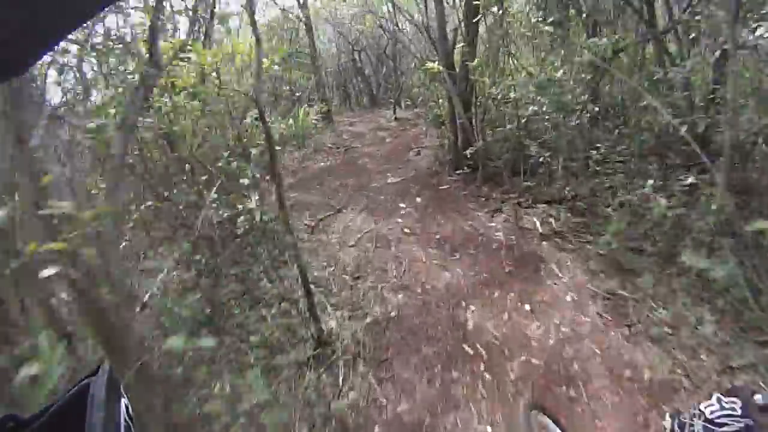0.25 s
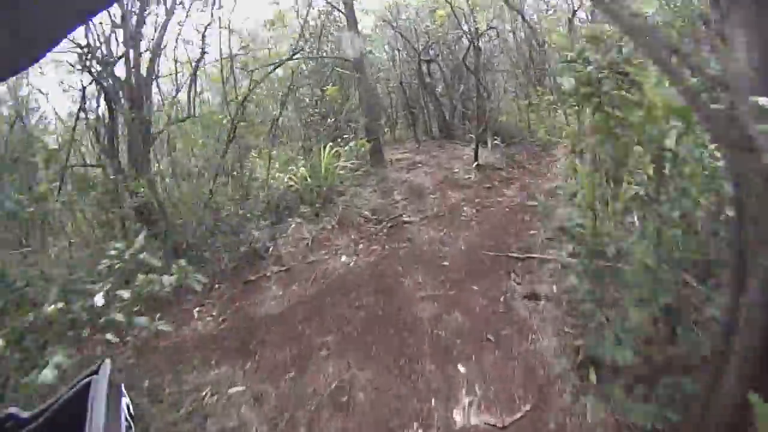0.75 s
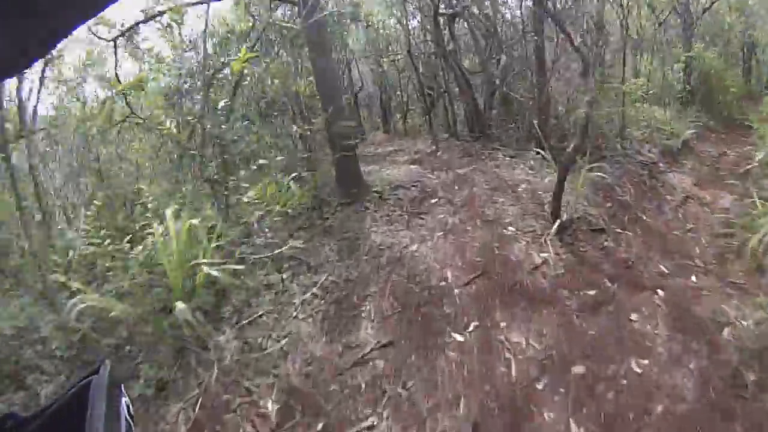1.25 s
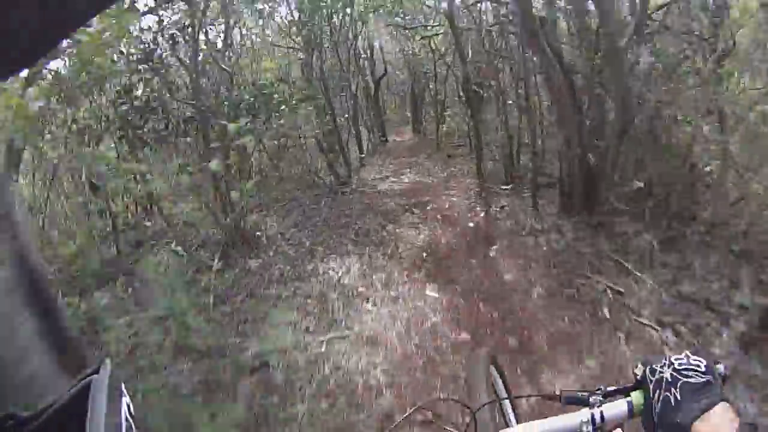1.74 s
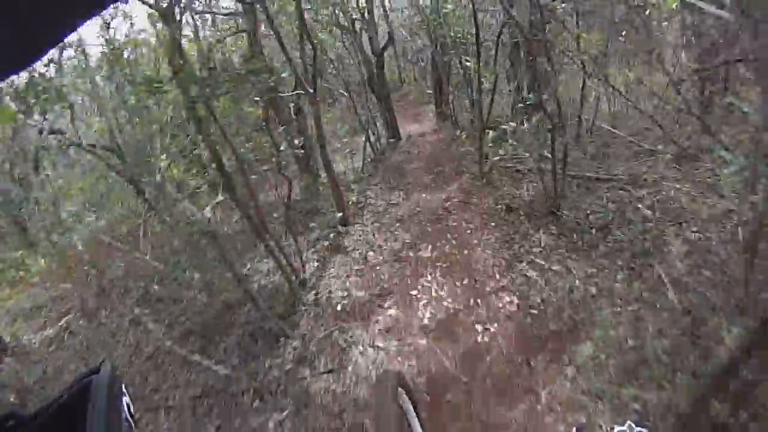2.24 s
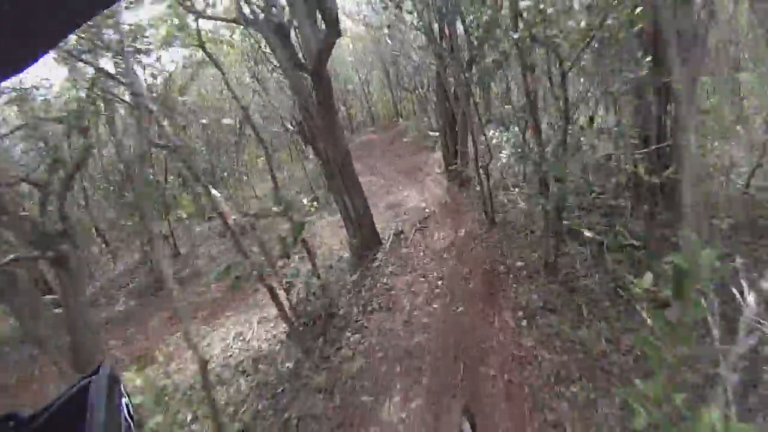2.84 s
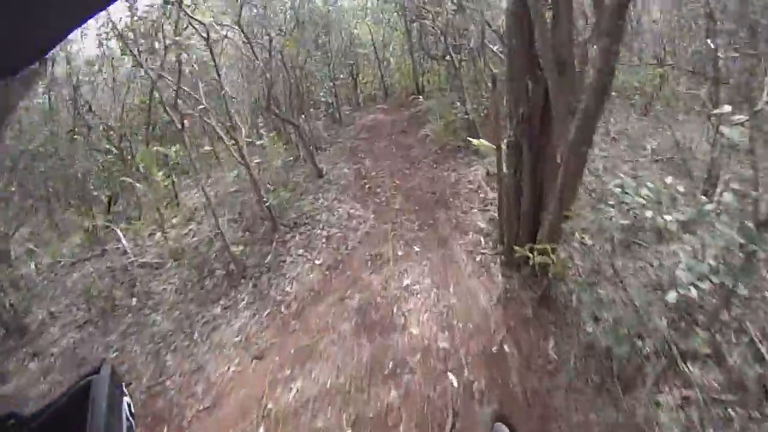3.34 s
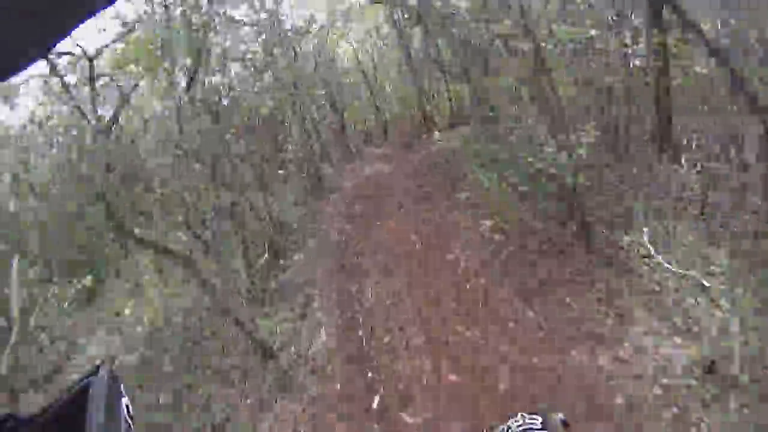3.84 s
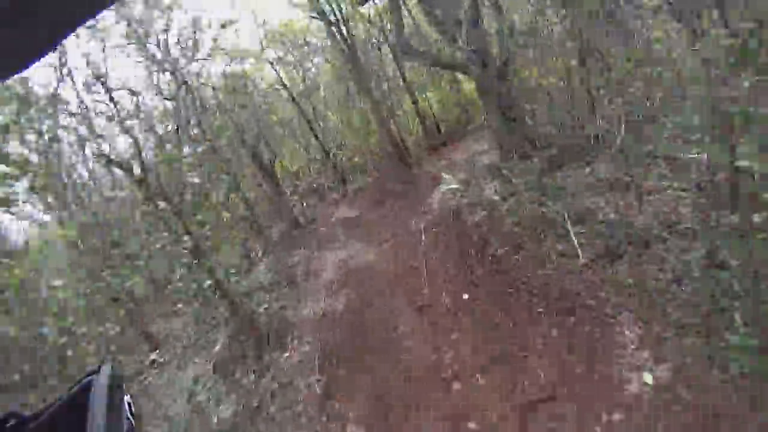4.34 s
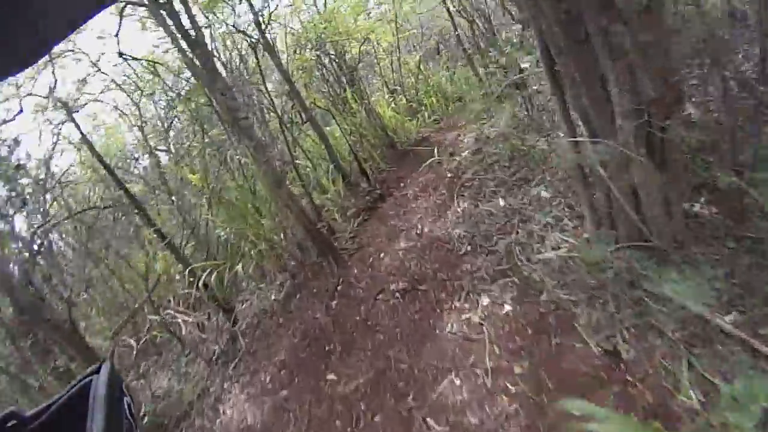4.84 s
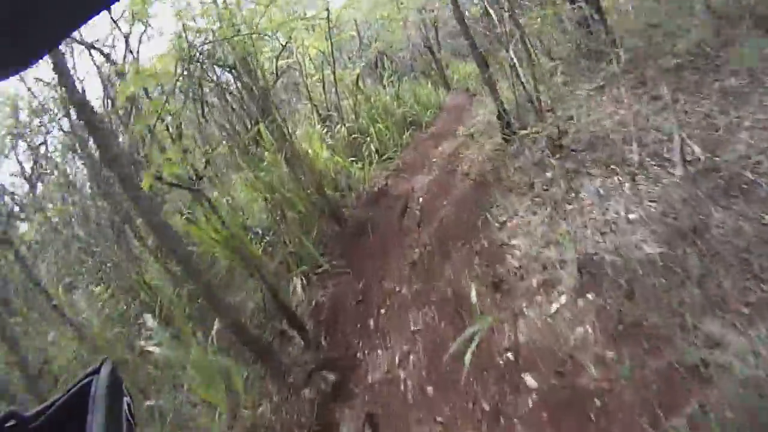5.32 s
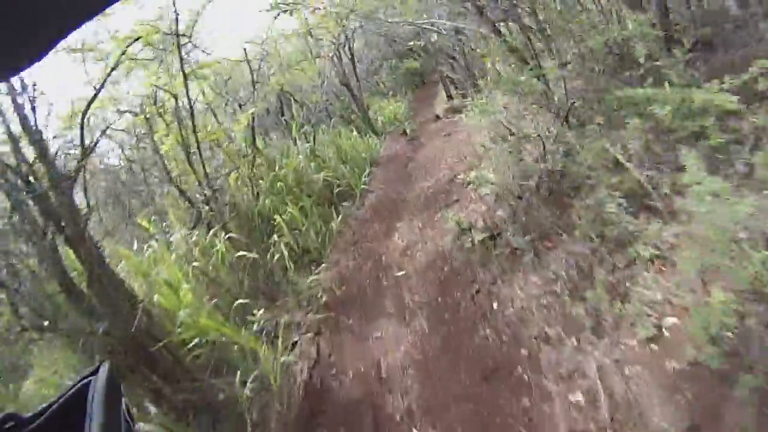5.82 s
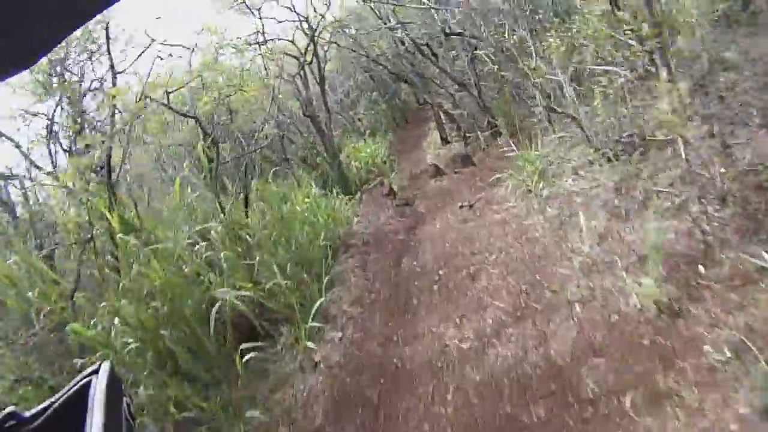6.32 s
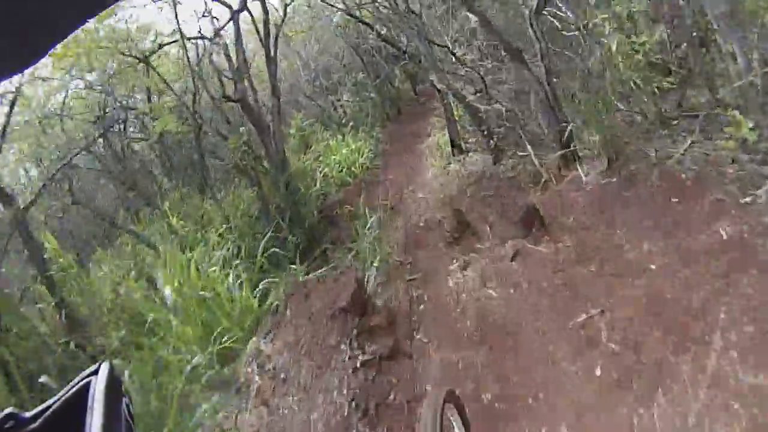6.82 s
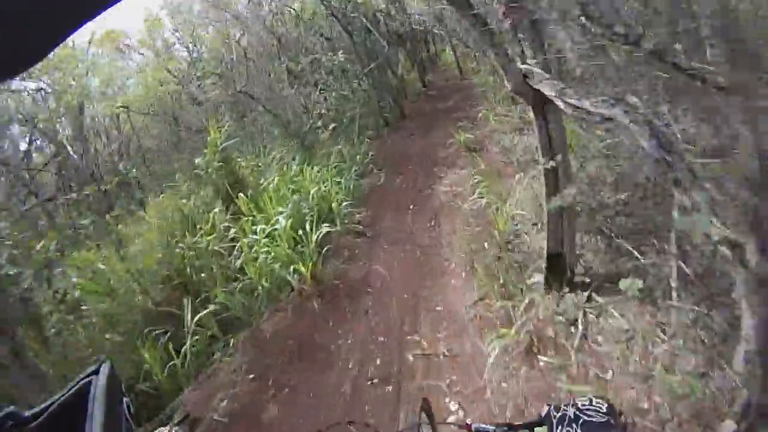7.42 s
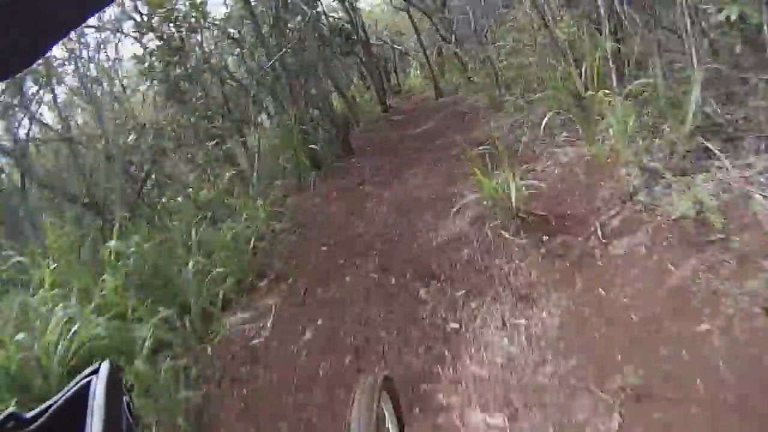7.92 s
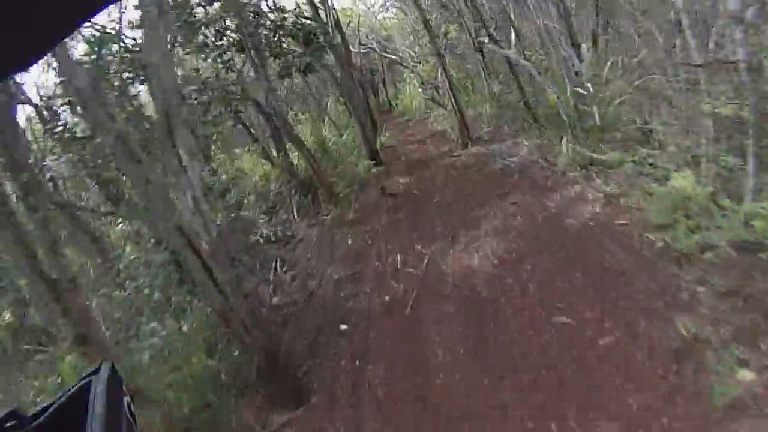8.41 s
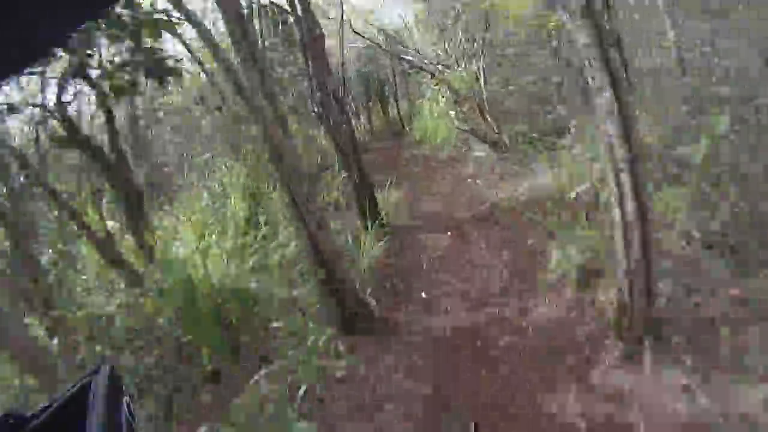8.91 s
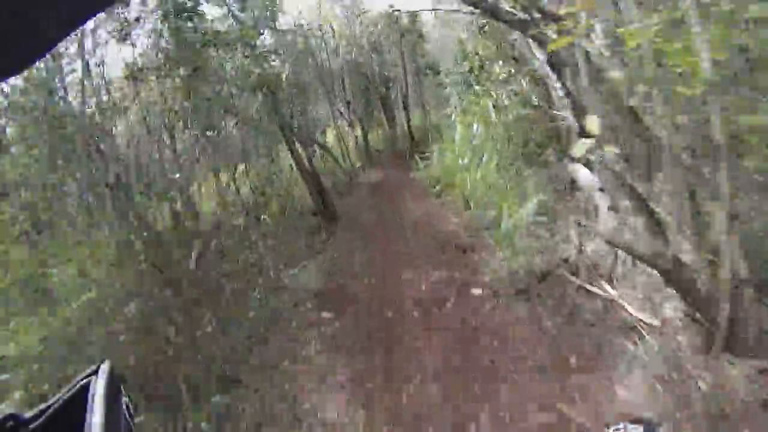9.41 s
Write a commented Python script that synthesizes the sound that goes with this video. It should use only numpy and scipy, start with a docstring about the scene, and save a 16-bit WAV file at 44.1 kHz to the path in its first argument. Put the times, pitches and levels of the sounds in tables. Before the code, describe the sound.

A mountain bike rolls down a dirt forest trail, heard close and dry from a cased camera worn by the rider. The tyres hiss, crunch and drum over a deep swaying rumble. Early on, a pebble clicks sharply off the bike and the chain tings faintly. Then rough patches bring clusters of thumps, plastic knocks and chain rattle, loudest in the second half as the rolling grows stronger.

```python
"""Dirt forest trail: a mountain bike rolls downhill, heard from a cased camera worn by the rider.
The mount sways with a deep rumble. Tyres hiss, crunch and drum through the resonances of the case.
The chain rattles on rough ground, single links ting on a sprocket, a pebble hits the frame.
Bumps thump the mount, knock the bracket, ring the case and clack its latch."""
import sys
import numpy as np
from scipy import signal
from scipy.fft import rfft, irfft
from scipy.io import wavfile
from scipy.ndimage import uniform_filter1d

SR = 44100
rng = np.random.default_rng(int(sys.argv[2]) if len(sys.argv) > 2 else 0)


def unload_wav(signal):
    """Save mono or channel-first audio to the path in sys.argv[1] as 16-bit WAV at rate SR, clipped to [-1, 1]."""
    wavfile.write(
        sys.argv[1],
        SR,
        np.round(np.clip(np.atleast_2d(signal).T, -1, 1) * 32767).astype(np.int16),
    )


N = 426006
TIME_S = np.arange(N) / SR
CRUISE_DB = -54.5

# Levels are relative within each table.
# Rolling strength, rising with speed: t/s, level/dB
ROLLING = [(0.0, -56.5), (0.35, -58.5), (0.85, -54.5), (1.45, -57), (1.9, -55.5), (2.35, -60),
           (2.95, -56.5), (3.85, -57), (4.85, -62), (5.25, -55), (6.4, -54.5), (7.4, -51), (7.8, -45),
           (8.2, -49.5), (8.75, -50.5), (9.05, -48.5), (9.66, -49)]
# Rough ground: start/s, end/s, roughness/dB
ROUGH_STRETCHES = [(2.655, 2.746, -4.5), (2.916, 3.54, -7.5), (3.69, 3.78, -6.5), (4.57, 4.77, -14),
                   (5.23, 5.405, -0.5), (5.452, 5.853, -3), (5.94, 6.03, 3.5), (6.08, 6.296, -3),
                   (6.513, 6.7, -5.5), (7.772, 7.89, 6.5), (7.923, 8.15, -3.5), (8.847, 9.298, -11),
                   (9.368, 9.518, 2.5)]
# Trail dips that make the rider lurch: t/s, sway/dB
TRAIL_DIPS = [(0.48, -26.5), (1.64, -23.5), (2.82, -20), (3.05, -26), (3.24, -27.5), (3.6, -25.5),
              (4.8, -36), (5.19, -21.5), (6.57, -18.5), (6.98, -27), (7.27, -18.5), (7.8, -9.5),
              (7.91, -18.5), (9.24, -21), (9.53, -23)]
# Strikes of chain and pebble: t/s, level/dB
LINK_TINGS = [(0.7711, -49), (0.9637, -55), (2.0383, -55.5), (2.2176, -52), (8.2784, -46), (8.9501, -48),
              (9.078, -46), (9.2229, -47)]
CHAIN_SLAPS = [(0.4733, -46.5), (0.675, -44), (1.1482, -42), (1.478, -46), (2.7222, -32), (2.9809, -22.5),
               (3.0114, -37), (3.3786, -35.5), (3.406, -37), (3.69, -38.5), (4.568, -39.5), (5.272, -35),
               (5.305, -33.5), (5.732, -32), (5.7836, -31), (5.9424, -29.5), (5.9678, -32), (6.02, -28.5),
               (6.309, -36), (6.5642, -37.5), (6.703, -40), (6.731, -39.5), (7.7954, -32), (7.8244, -26),
               (7.857, -31), (8.087, -34), (8.1399, -34), (9.365, -31), (9.397, -29), (9.4444, -29),
               (9.5083, -33)]
PEBBLE_CLICKS = [(1.565, -26), (1.5715, -20.5)]
# Bumps: t/s, mount thump/dB, bracket knock/dB, case ring/dB, latch clack/dB
BUMP_HITS = [(0.398, -44, -33, -52, -56), (0.62, -37, -30, -45, -56), (2.443, -48, -30, -46, -60),
             (2.5515, -53, -27, -35.5, -42), (2.8326, -47, -24, -40, -38), (2.91, -52, -25, -33, -30),
             (2.965, -28, -28.5, -58, -48), (3.174, -37, -25.5, -43, -37), (3.319, -37, -31, -39, -49),
             (3.625, -37, -28.5, -36, -44), (3.737, -18, -23.5, -36.5, -38),
             (5.071, -29, -25.5, -34.5, -37), (5.2334, -17.5, -16, -17.5, -14.5),
             (5.3445, -18, -16.5, -22.5, -35), (5.423, -26, -26, -55, -44),
             (5.583, -34, -19.5, -19.5, -18.5), (5.603, -16, -15.5, -34, -35), (5.772, -13, -18, -32, -42),
             (5.796, -15.5, -21, -36, -40), (6.56, -26, -23, -34, -48), (7.24, -21, -23, -32, -53),
             (7.457, -44, -33.5, -52, -57), (7.769, -12, -19.5, -33, -39),
             (7.828, -12.5, -12.5, -23.5, -26), (7.858, -10, -19.5, -38, -30), (7.903, -38, -21, -49, -49),
             (7.933, -48, -39, -29, -27.5), (9.009, -32, -29, -48, -38), (9.268, -14, -20.5, -42, -30.5),
             (9.353, -35, -19.5, -27, -23.5), (9.4416, -17.5, -22.5, -19, -28)]

# Source spectra: f/Hz, density/dB
SWAY_SPECTRUM = [(10, -24), (21, 1), (28, 3), (40, -10), (57, -15.5), (80, -32), (130, -35.5), (400, -84.5),
                 (3000, -120)]
HISS_SPECTRUM = [(300, -22), (600, -13.5), (1050, -14), (1250, -2.5), (1350, 1.5), (1450, 2.5),
                 (1650, -9.5), (2050, -6.5), (2700, -10.5), (3200, -19.5), (5500, -30), (7400, -33),
                 (8500, -36.5), (15000, -54)]
RUMBLE_SPECTRUM = [(30, -25), (70, 5.5), (120, 0.5), (165, 5), (230, -2), (330, -3), (380, 3.5), (440, -9),
                   (540, -9), (680, -20), (815, -16.5), (1000, -21.5), (3000, -68.5), (16000, -107)]
CHAIN_SPECTRUM = [(150, -45), (1000, -4.5), (1700, -9.5), (2170, 4), (2600, 5.5), (3200, -3.5),
                  (4900, -8.5), (5700, -8.5), (7300, -4), (8800, -20), (11000, -22), (12500, -37),
                  (16000, -49)]
PEBBLE_SPECTRUM = [(500, -18), (1300, -10), (2400, 4.5), (3600, 0.5), (4500, -1.5), (6000, -1), (8000, -4),
                   (10000, -14), (11200, -2), (13000, -15), (16000, -16)]

# Modes of struck parts: f/Hz, level/dB, t60/s
SPROCKET_MODES = [(5200, -7, 0.043), (6500, 1, 0.018), (7370, -6, 0.044), (7490, -2.5, 0.027),
                  (10500, -15, 0.034)]
MOUNT_MODES = [(55, 13.5, 0.32), (86.5, 6.5, 0.037)]
BRACKET_MODES = [(172.8, -5, 0.19), (202.4, 9, 0.022), (279.6, -7, 0.073), (367.2, -0.5, 0.12),
                 (466.5, -12.5, 0.1), (674, -7, 0.02), (835, -9.5, 0.04), (998, 2, 0.0043)]
CASE_MODES = [(1200, -2, .022), (1360, 0, .028)]
LATCH_MODES = [(2070, 0, .022), (2240, -3, .018), (3490, -26, .016), (4330, -20, .015), (5090, -23, .015)]
# Air and wall resonances of the case: f/Hz, width/Hz, gain re direct sound/dB
CAVITY_PEAKS = [(3524, 68, -2), (4270, 74, 0.5), (4740, 100, 2.5), (5090, 150, 2), (5480, 100, 1),
                (11080, 450, -1.5)]


def amp(db):
    """dB to gain."""
    return 10 ** (np.asarray(db) / 20)


def unit_rms(x):
    """Scale to rms 1."""
    return x / np.sqrt(np.mean(x ** 2) + 1e-20)


def unit_peak(x):
    """Scale to peak 1."""
    return x / (abs(x).max() + 1e-20)


def add(mix, at_s, sound):
    """Mix in at at_s."""
    part = mix[max(0, round(at_s * SR)):][:len(sound)]
    part += sound[:len(part)]


def colour(x, spectrum, size=8192):
    """Causal filter: clicks keep their sharp front."""
    hz, db = np.transpose(spectrum)
    bins_hz = abs(np.fft.fftfreq(size, 1 / SR))
    log_gain = np.log(amp(np.interp(np.log(bins_hz + 1), np.log(hz), db)))
    response = np.exp(signal.hilbert(log_gain).conj())
    taps = np.fft.ifft(response).real[:size // 2]
    return signal.oaconvolve(x, taps)[:len(x)]


def wander(rate_hz):
    """Smooth random curve, rms 1."""
    lowpass = np.exp(-(np.fft.rfftfreq(N, 1 / SR) / rate_hz) ** 2)
    return unit_rms(irfft(rfft(rng.standard_normal(N)) * lowpass, N))


def grains(per_s, spread_db):
    """Random clicks: many small, few large."""
    size = amp(spread_db * np.minimum(rng.exponential(1, N), 4))
    return unit_rms(size * rng.choice([-1, 1], N) * (rng.random(N) < per_s / SR))


def burst(t, fall_s):
    """Decaying white noise."""
    return rng.standard_normal(len(t)) * np.exp(-t / fall_s)


def ring(modes, t, detune=1):
    """Decaying modes of a struck part."""
    return sum(amp(db - 60 * t / t60_s) * np.sin(2 * np.pi * hz * detune * t) for hz, db, t60_s in modes)


def swell(start_s, end_s, rise_s, fall_s):
    """Rise until start_s, hold until end_s, decay."""
    away = np.maximum((start_s - TIME_S) / rise_s, (TIME_S - end_s) / fall_s)
    return np.exp(-np.clip(away, 0, 20))


def pace():
    """Rolling strength, 1 at cruise."""
    return amp(np.interp(TIME_S, *np.transpose(ROLLING)) - CRUISE_DB)


def shaking(smooth_db=-15.5, rise_s=0.017, fall_s=0.048):
    """The ground shakes the bike: always a little, more on rough stretches."""
    rough = [amp(db) * swell(start_s, end_s, rise_s, fall_s) for start_s, end_s, db in ROUGH_STRETCHES]
    return amp(smooth_db) + np.max(rough, axis=0)


def mount_sway(rolling_db=-40, rough_db=-29, pace_exp=0.34, rough_exp=0.73, steady_exp=0.86):
    """The camera rocks on its springy mount: gently with speed, more on rough ground, most in dips."""
    motion = unit_rms(colour(rng.standard_normal(N), SWAY_SPECTRUM, size=16384))
    envelope = np.sqrt(uniform_filter1d(abs(signal.hilbert(motion)) ** 2, size=4000))
    pushes = [amp(rolling_db) * pace() ** pace_exp, amp(rough_db) * shaking() ** rough_exp]
    pushes += [amp(db) * swell(at_s, at_s, rise_s=0.024, fall_s=0.074) for at_s, db in TRAIL_DIPS]
    return unit_rms(motion / envelope ** steady_exp) * np.sqrt(sum(push ** 2 for push in pushes))


def tyres(hiss_db=-50, rumble_db=-48, grit=0.36, jolt=0.76, patchy_db=1, lumpy_db=0.13, pace_exp=0.86):
    """Knobs crush grit and drum on soil; both follow speed and uneven ground."""
    ground = wander(rate_hz=36)
    crunch = unit_rms(rng.standard_normal(N) + grit * grains(per_s=1200, spread_db=2.5))
    drumming = unit_rms(rng.standard_normal(N) + jolt * grains(per_s=80, spread_db=1.5))
    hiss = unit_rms(colour(crunch, HISS_SPECTRUM)) * amp(hiss_db + patchy_db * ground)
    rumble = unit_rms(colour(drumming * amp(lumpy_db * ground), RUMBLE_SPECTRUM)) * amp(rumble_db)
    return hiss * pace() + rumble * pace() ** pace_exp


def case_cavity(x):
    """Airborne sound picks up the narrow resonances of the case."""
    return x + sum(amp(db) * signal.lfilter(*signal.iirpeak(hz, hz / width_hz, fs=SR), x)
                   for hz, width_hz, db in CAVITY_PEAKS)


def sprocket_tings(gain_db=2, touch_s=0.003, faint_db=-59, spread_db=3, faint_count=26):
    """A link brushes a tooth, which rings; faint random touches fall between the clear ones."""
    out, t = np.zeros(N), np.arange(SR // 15) / SR
    faint = [(when * N / SR, faint_db + spread_db * (2 * size - 1))
             for when, size in rng.random((faint_count, 2))]
    for at_s, db in LINK_TINGS + faint:
        ting = signal.fftconvolve(burst(t, touch_s), ring(SPROCKET_MODES, t))
        add(out, at_s, amp(db + gain_db) * unit_peak(ting))
    return out


def link_clatter(rise_s=0.001, fall_s=0.011, hit_share=0.15, tint_db=4, size=1536, bands=40):
    """A quick run of links landing; each stretch of chain has its own tint."""
    t = np.arange(size) / SR
    landings = burst(t, fall_s) * (rng.random(size) < hit_share)
    spectrum = rfft(landings * (1 - np.exp(-t / rise_s)))
    band_axis = np.linspace(0, bands - 1, len(spectrum))
    tint = np.interp(band_axis, np.arange(bands), rng.standard_normal(bands))
    return unit_peak(irfft(spectrum * amp(tint_db * tint), size))


def chain(jingle_db=-52.5, slap_gain_db=12, spread_db=2, count=850):
    """Small random clatters, scaled by the shaking; slaps are the large ones."""
    jingle, slaps = np.zeros(N), np.zeros(N)
    for when, quantile in rng.random((count, 2)):
        db = spread_db * min(-np.log(1 - quantile), 3)
        add(jingle, when * N / SR, amp(db) * link_clatter())
    for at_s, db in CHAIN_SLAPS:
        add(slaps, at_s, amp(db + slap_gain_db) * link_clatter())
    jingle = unit_rms(colour(jingle, CHAIN_SPECTRUM)) * shaking() * amp(jingle_db)
    return jingle + colour(slaps, CHAIN_SPECTRUM)


def pebble(fall_s=0.0017, tube_hz=4520, tube_rel_db=-25, tube_fall_s=0.0094):
    """Two hard, bright clicks on the frame; the tube rings faintly."""
    out, t = np.zeros(N), np.arange(SR // 10) / SR
    tube = amp(tube_rel_db) * np.sin(2 * np.pi * tube_hz * t) * np.exp(-t / tube_fall_s)
    for at_s, db in PEBBLE_CLICKS:
        click = unit_peak(colour(burst(t, fall_s), PEBBLE_SPECTRUM))
        add(out, at_s, amp(db) * (click + tube))
    return out


def bumps(thump_gain_db=-2, clack_gain_db=1, scuff_gain_db=-4, scuff_s=0.039,
          chatter=0.056, contact_s=0.003, push_s=0.0049, flex_s=0.00096, scatter=0.015):
    """A blow, a chatter of loose parts and a tyre scuff; the soft mount answers last."""
    out, scuffs, t = np.zeros(N), np.zeros(N), np.arange(SR // 4) / SR
    flex = 1 - np.exp(-(t / flex_s) ** 2)  # plastic takes a moment to ring
    push = 1 - np.exp(-t / push_s)
    for at_s, thump_db, knock_db, case_db, clack_db in BUMP_HITS:
        detune = 1 + scatter * rng.standard_normal()
        blow = chatter * burst(t, contact_s)
        blow[0] += 1
        add(scuffs, at_s, amp(knock_db + scuff_gain_db) * burst(t, scuff_s))
        thump = unit_peak(push * ring(MOUNT_MODES, t, detune))
        add(out, at_s, amp(thump_db + thump_gain_db) * thump)
        parts = (BRACKET_MODES, knock_db), (CASE_MODES, case_db), (LATCH_MODES, clack_db + clack_gain_db)
        for modes, db in parts:
            struck = signal.fftconvolve(blow, flex * ring(modes, t, detune))[:len(t)]
            add(out, at_s, amp(db) * unit_peak(struck))
    return out + colour(scuffs, RUMBLE_SPECTRUM)


def scene():
    """One microphone, close and dry."""
    airborne = case_cavity(tyres() + chain())
    return (airborne + mount_sway() + bumps() + sprocket_tings() + pebble())[None]


def record(dry, floor_db=-76, cutoff_hz=15400):
    """Microphone hiss, then the camera's band limit."""
    taps = signal.firwin(255, cutoff_hz, window=("kaiser", 8), fs=SR)
    return signal.oaconvolve(dry + amp(floor_db) * rng.standard_normal(N), taps[None], "same")


dry = scene()
out = record(dry)
unload_wav(out)
```